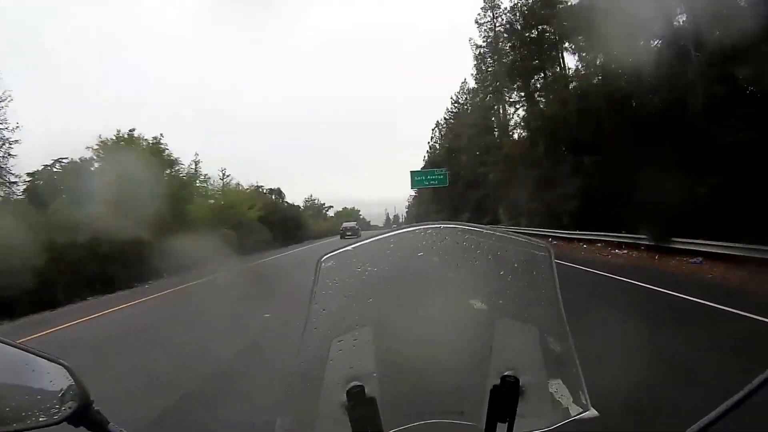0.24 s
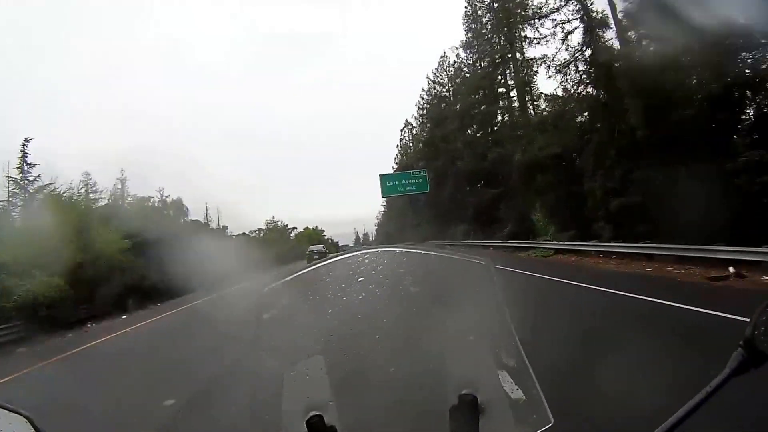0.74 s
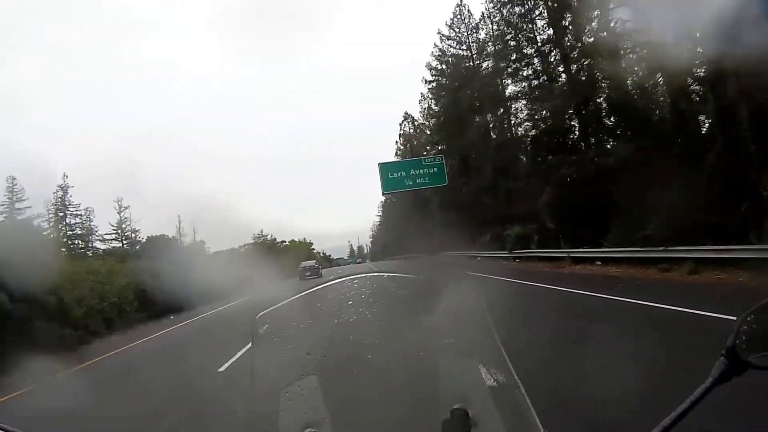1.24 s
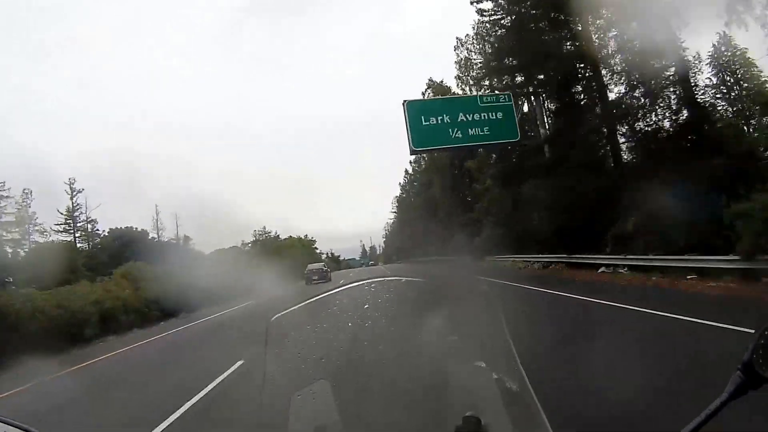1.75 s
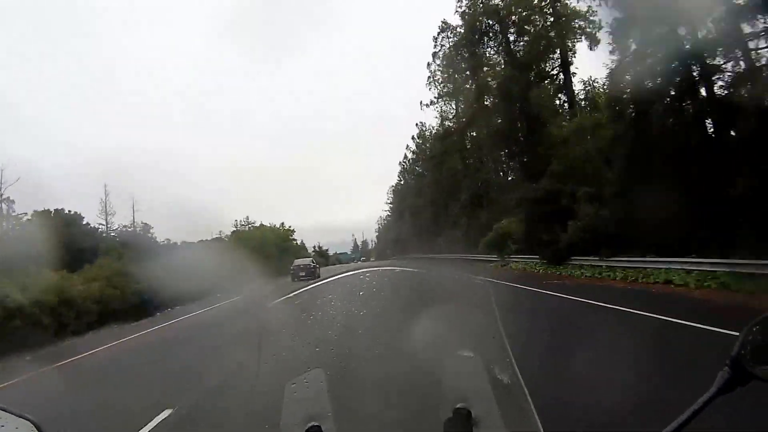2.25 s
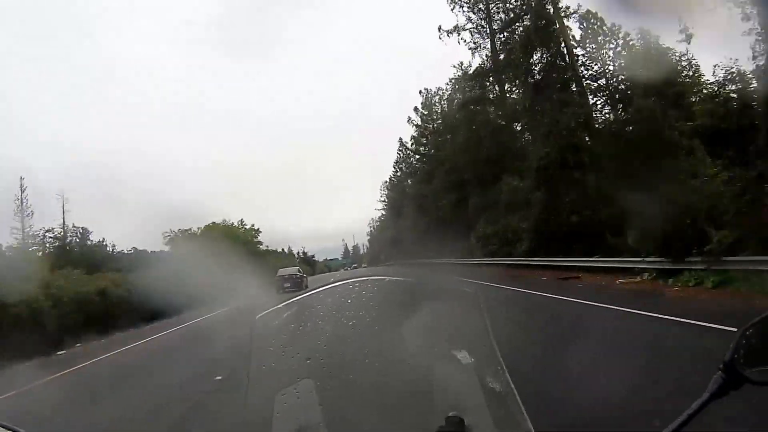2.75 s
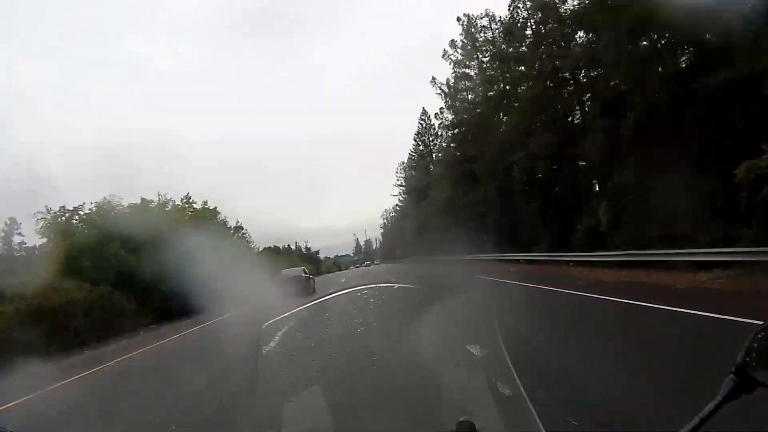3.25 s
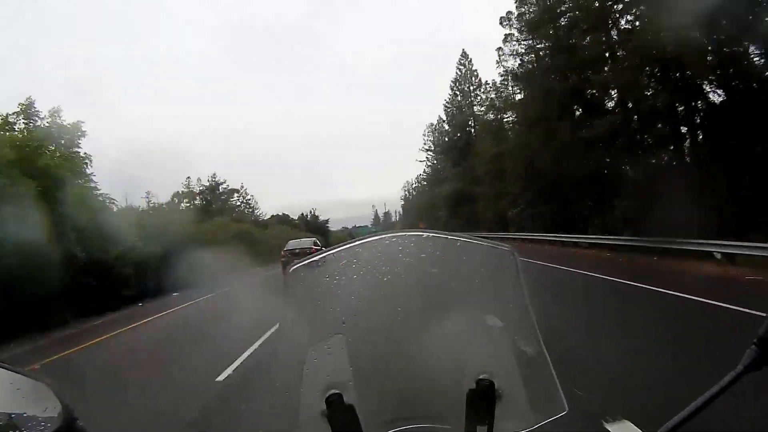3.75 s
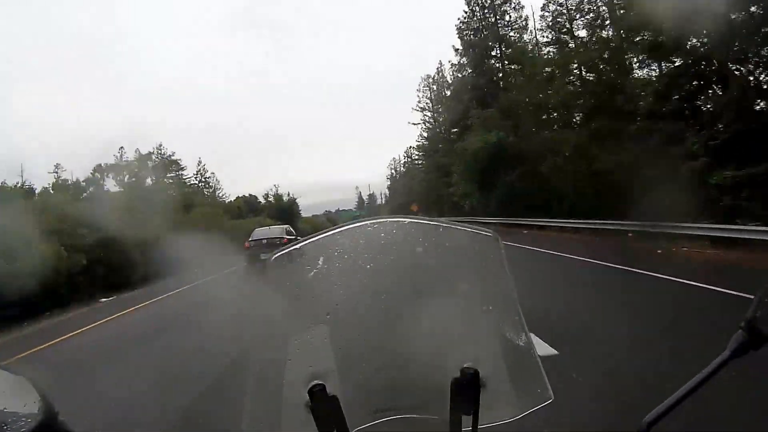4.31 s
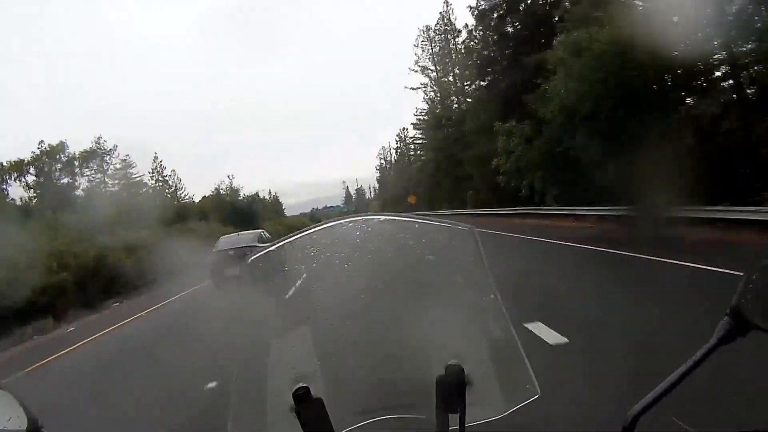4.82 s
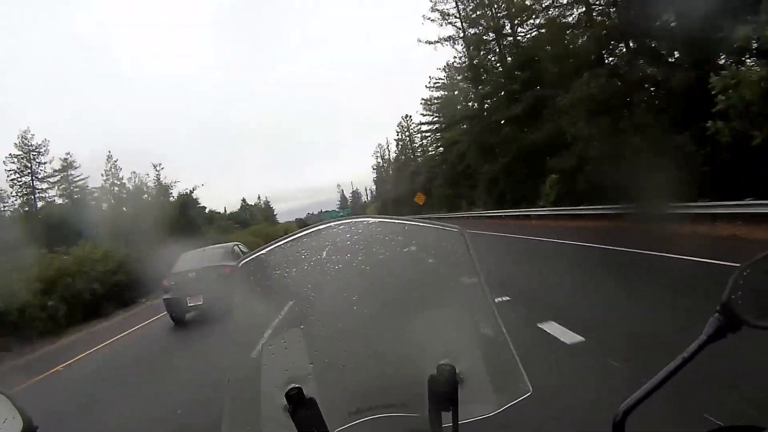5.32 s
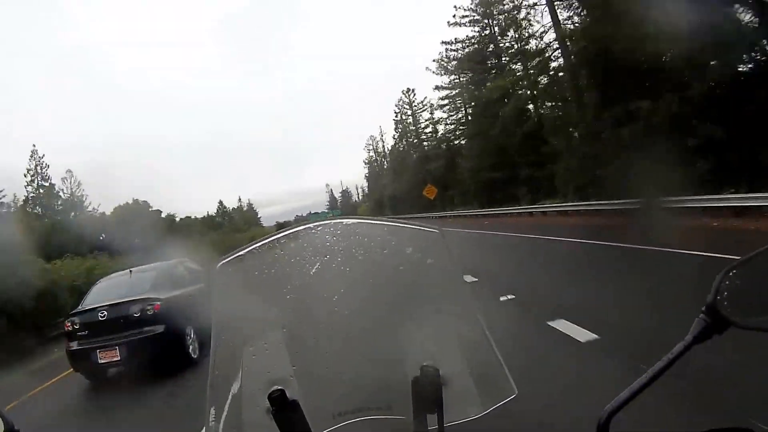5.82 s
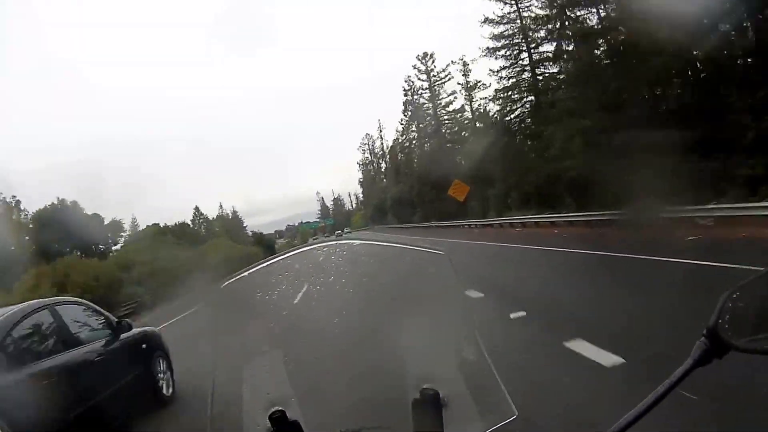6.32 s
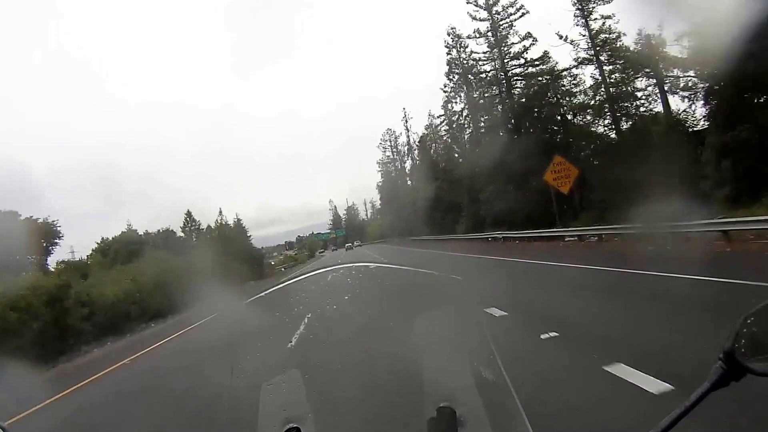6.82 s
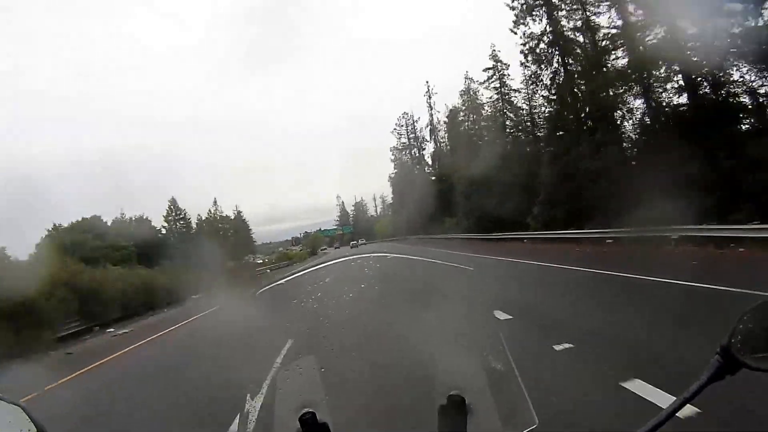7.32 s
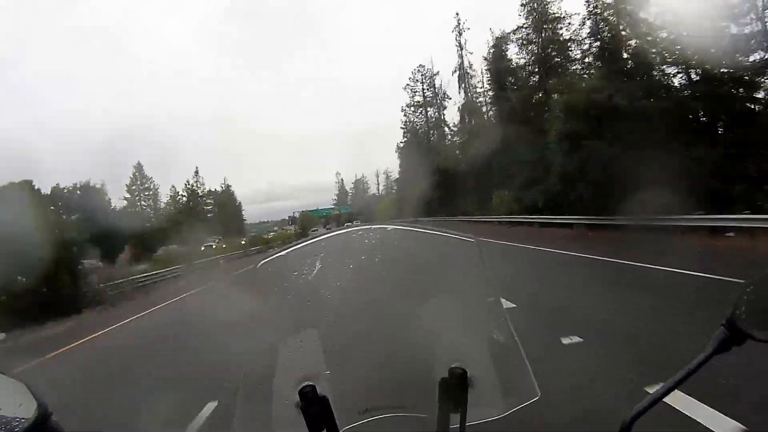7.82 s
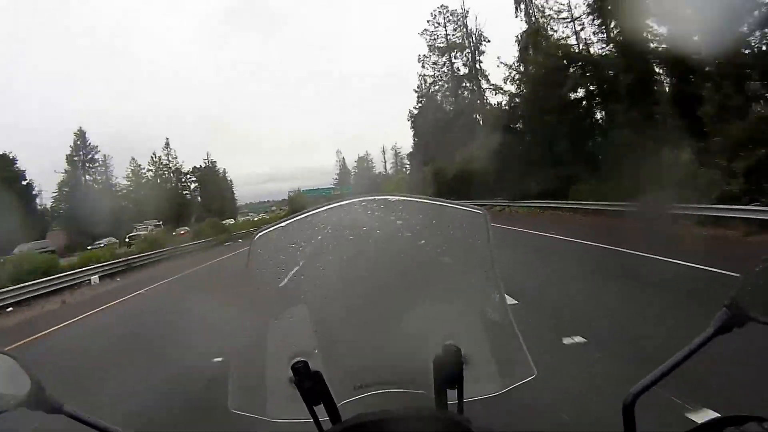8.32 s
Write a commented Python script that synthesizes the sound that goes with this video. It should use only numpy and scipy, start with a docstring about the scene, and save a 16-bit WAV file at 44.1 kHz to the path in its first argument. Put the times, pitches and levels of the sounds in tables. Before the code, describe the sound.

Deep, fluttering wind rumble buffets the microphone from start to finish, heard from inside a plastic camera housing on a motorcycle cruising a wet highway. The housing knocks on its mount in quick, irregular clusters of close, hollow clacks and thuds, busiest from about 2 to 3.3 seconds. Gusts land as low thumps; the hardest, near 3.2, 3.8, 4.8 and 8.3 seconds, can briefly overload the microphone and duck everything. The rumble tightens into short throbs between 4 and 5.3 seconds and again around 7. A continuous hiss of air and tyre spray sits behind it, with a few faint raindrop ticks. The engine drones quietly underneath at a steady, slightly wavering pitch. Around 5 seconds a faint tyre whine appears, then an overtaken car swishes softly by near 6 seconds. Wind and rattling carry on until the end, at about 8.5 seconds.

```python
"""Wind thuds and a plastic camera housing knocks on its mount as a motorcycle cruises a wet highway.
Eddies shed by the windscreen buffet the housing, and each impact rings the resonances of its shell.
Air and spray rush over it, raindrops tick, the engine drones underneath and an overtaken car swishes by.
The hardest gusts overload the microphone, and the gain control ducks everything for a moment."""
import sys
import numpy as np
from scipy import signal
from scipy.fft import rfft, irfft, next_fast_len
from scipy.io import wavfile
from scipy.ndimage import uniform_filter1d

SR = 44100
rng = np.random.default_rng(int(sys.argv[2]) if len(sys.argv) > 2 else 0)


def pcm_store(signal):
    """Save signal as 16-bit PCM."""
    levels = np.round(np.clip(np.atleast_2d(signal), -1, 1) * 32767)
    wavfile.write(sys.argv[1], SR, levels.astype(np.int16).T)


N = 377496
TIME = np.arange(N) / SR


# Strength of the airstream. Each row: time in seconds, relative rush in dB, relative buffeting in dB.
WIND_LEVELS = [(0, -35, -16), (0.45, -34, -17.5), (0.55, -33, -18), (0.72, -34.5, -19), (0.85, -32.5, -23),
               (1.1, -37, -11), (1.55, -34, -21), (1.7, -33, -29), (1.85, -36, -16), (1.97, -31.5, -19),
               (2.15, -36, -14), (2.36, -32, -19), (2.5, -37, -11.5), (2.9, -36, -10.5), (3.1, -38.5, -17),
               (3.25, -35, -9.5), (3.42, -35.5, -13.5), (3.75, -37, -12), (3.9, -36, -20.5),
               (4.0, -38, -12.5), (4.31, -33, -8), (4.46, -34.5, -11.5), (4.76, -37, -17),
               (4.85, -38.5, -16), (5.0, -35, -12), (5.08, -35.5, -22), (5.2, -36, -9), (5.5, -34.5, -17.5),
               (6.0, -33.8, -16.5), (6.41, -36.5, -13.5), (6.56, -35.5, -13), (6.9, -35.5, -16.5),
               (7.26, -34, -14), (7.5, -39.5, -7), (7.66, -32, -16.5), (7.88, -35, -20), (8.13, -34.5, -13),
               (8.28, -37, -14), (8.56, -35, -21)]

def wind_levels():
    """Unsteady flow modulates amplitude: the levels of rush and buffeting in dB at every sample."""
    times, rush_db, buffet_db = np.transpose(WIND_LEVELS)
    return np.interp(TIME, times, rush_db), np.interp(TIME, times, buffet_db)


# Pressure spectrum of the wake. Each row: frequency in Hz, relative spectral density in dB.
WAKE_SPECTRUM = [(8, -32), (22, -19), (32, -30), (42, -18), (54, 1), (66, -2.5), (90, -1.5), (130, -6.5),
                 (200, -14), (400, -28), (1500, -71)]

def eddies(evenness=0.55, clear_s=0.014):
    """Vortex shedding behind the windscreen gives fairly even swings; a hard gust sweeps them away."""
    wake = noise(lambda hz: spectrum_gain(WAKE_SPECTRUM, hz))
    envelope = uniform_filter1d(np.abs(signal.hilbert(wake)), SR // 100)
    gust_onsets = impulses([(start, 0) for start, _ in GUSTS])
    swept = swing(gust_onsets, hz=0, width_s=clear_s, lag_s=0)
    return unit_rms(wake / envelope ** evenness) * np.clip(1 - swept, 0, 1)


def buffeting(wake, level_db, trim_db=-9.5, gustiness_db=1.2, ceiling_db=-14):
    """The fluctuating pressure of the wake loads the housing, saturating softly at a ceiling."""
    pressure = from_db(level_db + trim_db + gustiness_db * drift(5.4)) * wake
    ceiling = from_db(ceiling_db)
    return ceiling * np.tanh(pressure / ceiling)


# Spells of periodic shedding. Each row: start in seconds, length in seconds, relative level in dB.
THROBS = [(0.95, 0.25, -17), (3.316, 0.11, -17), (3.94, 0.17, -9), (4.203, 0.13, -12), (4.458, 0.074, -10),
          (4.953, 0.069, -13), (5.127, 0.162, -9), (6.738, 0.13, -9.5), (7.412, 0.17, -9)]

def throb(buffet, throb_hz=55.93, wander=0.062, fade_s=0.036, takeover=0.63, trim_db=-10):
    """Lock-in: the eddies fall into step, and an even throb displaces much of the random buffeting."""
    tone = np.sin(wandering_phase(throb_hz, wander, drift_hz=8.1))
    for start, length, db in THROBS:
        locked = np.clip(np.minimum(TIME - start, start + length - TIME) / fade_s, 0, 1)
        buffet = buffet * (1 - takeover * locked) + from_db(db + trim_db) * locked * tone
    return buffet


# Gusts that slam into the housing. Each row: time in seconds, relative peak pressure in dB.
GUSTS = [(0.1425, 0.5), (0.205, -7), (0.248, -2.5), (0.486, 0.5), (0.736, -0.5), (1.54, -1.5), (1.885, 0.6),
         (2.048, -2.5), (2.282, -1), (2.426, -0.5), (2.632, 0), (2.705, -0.5), (2.751, -1.5), (2.864, -2.5),
         (3.161, 3), (3.228, 0.5), (3.49, -1.9), (3.759, 3), (4.1075, 2), (4.322, 0.5), (4.435, -2.5),
         (4.589, 1.5), (4.784, 3), (5.376, -0.5), (6.175, -2), (6.504, 1), (6.584, -0.5), (6.956, -1.3),
         (7.045, -0.5), (7.189, 2), (7.748, -1), (7.955, -0.5), (8.252, 4)]

def gusts(suction_db=-12, crest_db=-24, swing_hz=70, width_s=0.0082, lead_s=0.0077):
    """Each hard gust is a pressure transient: a small crest, then one deep suction."""
    slams = impulses(GUSTS)
    crest = from_db(crest_db) * swing(slams, swing_hz, width_s, -lead_s)
    suction = from_db(suction_db) * swing(slams, swing_hz, width_s, 0)
    return crest - suction


# Impacts of the housing on its stop. Each row: time in seconds, relative peak level in dB.
KNOCKS = [(0.0179, -9.5), (0.0315, -6), (0.1257, -6.5), (0.144, -1), (0.1901, -0.5), (0.208, -3),
          (0.2509, 0), (0.2983, 2.5), (0.3139, -0.5), (0.3319, -10), (0.3475, -13.0), (0.45, -9),
          (0.4889, -3), (0.549, -1.5), (0.563, 0.5), (0.6134, -7.5), (0.6615, -11), (0.7044, -17),
          (0.724, -7.5), (0.742, 5), (0.8897, -11), (0.908, -15), (0.955, -13), (1.07, -2), (1.1345, -7.5),
          (1.154, -8.5), (1.2283, -6.5), (1.3161, -4.5), (1.3305, -14), (1.4088, -10), (1.4227, -2),
          (1.437, -7), (1.5106, -10), (1.5271, -4.5), (1.5428, -3), (1.5575, -1), (1.5683, -3),
          (1.586, 2.5), (1.6041, -3.5), (1.63, -10), (1.7448, -3.5), (1.7574, -7), (1.7733, -8),
          (1.847, -6.5), (1.8869, -2.5), (1.927, -6), (1.9774, -13), (2.0163, -6.5), (2.037, -2.5),
          (2.0515, -4), (2.0668, -4), (2.1316, 1.5), (2.1479, 1.5), (2.165, -2.5), (2.18, -10),
          (2.221, -12), (2.2441, -3.5), (2.264, -7), (2.2849, 1.5), (2.307, 4.5), (2.325, 2.5),
          (2.3941, -4.5), (2.4102, -12), (2.4282, -10), (2.471, 2), (2.4898, 0.5), (2.5306, -5),
          (2.5493, -6.5), (2.6155, -2.5), (2.6334, 0.5), (2.651, 5.5), (2.7109, -3.5), (2.7547, 2.5),
          (2.7736, -1.5), (2.831, -9), (2.8507, -6.5), (2.866, -2.5), (3.0454, -4), (3.1527, -6),
          (3.1709, 6.5), (3.2332, 7.5), (3.25, 8.5), (3.2698, 1), (3.292, 2.5), (3.3107, -0.5),
          (3.4537, -9.5), (3.4986, 0), (3.5216, -8.5), (3.5614, -9.5), (3.584, -12), (3.6525, -9.5),
          (3.675, -7.5), (3.804, 4), (3.8215, 3.5), (3.962, -6), (3.98, -6), (4.055, -8.5), (4.107, -3.5),
          (4.131, -1), (4.1816, -2.5), (4.309, -7.5), (4.328, 4.5), (4.3465, 2.5), (4.368, -2),
          (4.421, -3.5), (4.442, -3), (4.579, -8), (4.6673, -4), (4.6875, -7.5), (4.702, -12),
          (4.756, -7.5), (4.998, -9.5), (5.045, -4.5), (5.1093, -8.5), (5.1659, -7.5), (5.2558, -5.5),
          (5.3326, -6.5), (5.3605, -3.5), (5.378, -0.5), (5.4002, 1.5), (5.4204, 0.5), (5.4953, -8),
          (5.6133, -5.5), (5.6275, -6), (5.6467, -4), (5.667, -24), (5.692, -16), (5.7487, -11.5),
          (5.7815, -18), (5.8637, -8), (5.935, -10), (5.97, -10.5), (5.9966, -12), (6.019, -7),
          (6.0405, -4.5), (6.1651, -6), (6.1839, 0.5), (6.2124, -8.5), (6.296, -8.5), (6.393, -6.5),
          (6.413, -13.5), (6.508, -5.5), (6.5719, 0), (6.5901, 6), (6.6643, -2.5), (6.7813, -7.5),
          (6.796, -3.5), (6.8104, -4.0), (6.828, -5), (6.8736, -3.5), (6.8915, -8.5), (6.9616, -8.5),
          (6.9822, -7), (7.055, -5.5), (7.0776, -7), (7.1017, -9), (7.1246, -2), (7.1436, -11), (7.2998, 1),
          (7.32, -17), (7.349, -5), (7.3716, -0.5), (7.3978, -1.5), (7.4205, -7.5), (7.622, -6),
          (7.6735, -10.5), (7.737, -9.5), (7.802, -3.5), (7.8204, -6), (7.893, -8), (7.952, -12.5),
          (8.2172, -10), (8.2404, -9), (8.26, 1.5), (8.3527, -9), (8.3698, -8), (8.443, -11),
          (8.5262, -9.5)]

def rattle(wake, touch_db=-26, spread_db=6, rebound_db=-7.5, thump_hz=250, thump_s=0.0025, shove_s=0.0023):
    """Impact excitation: the housing rocks and hits its stop with a tick, a thump and a shove of air."""
    knocks = impulses(KNOCKS)
    delays_s = rng.uniform(0.0004, 0.0014, len(KNOCKS))
    rebounds = impulses([(start + delay, db + rebound_db) for (start, db), delay in zip(KNOCKS, delays_s)])
    # Every crest of the wake adds a light touch.
    wake_phase = np.unwrap(np.angle(signal.hilbert(wake)))
    crests = np.flatnonzero(np.diff(wake_phase // (2 * np.pi)) > 0)
    touches = np.zeros(N)
    touches[crests] = from_db(touch_db + spread_db * np.minimum(rng.standard_normal(N)[crests], 2))
    blows = knocks + touches
    push = np.tanh(blows)   # the mount gives way under the hardest blows
    t = np.arange(SR // 20) / SR
    thump = from_db(-7) * np.exp(-t / thump_s) * np.sin(2 * np.pi * thump_hz * t)
    shove = from_db(-12) * np.sin(np.pi * np.minimum(t / shove_s, 1)) ** 2
    thuds = low_cut(signal.fftconvolve(push, thump + shove)[:N], hz=70)
    rocking = from_db(-25) * swing(push, hz=56.8, width_s=0.019, lag_s=0.0042)
    ticks = from_db(-1.5) * signal.fftconvolve(blows + rebounds, housing_ring())[:N]
    return ticks + crack(blows) + thuds + rocking


def crack(blows, level_db=-21, decay_s=0.0021, dull_hz=3500):
    """Friction: the faces grate as they meet, a broadband snap that is different on every blow."""
    grit = noise(lambda hz: housing_gain(hz) ** 0.48 * hz / np.hypot(hz, 700) / np.hypot(1, hz / dull_hz))
    return from_db(level_db) * decays(blows, decay_s) * grit


# Resonances of the shell. Each row: frequency in Hz, nominal width in Hz, relative level in dB.
SHELL_MODES = [(286, 158, 35.5), (673, 116, 23), (934, 102, 17.5), (1403, 170, 12), (1750, 56, 7.5),
               (1985, 113, 11), (2290, 92, 10), (2500, 176, 14), (2773, 200, 13), (3370, 320, 11.5),
               (4480, 360, -1), (5030, 540, -8), (7820, 1040, -6), (8630, 160, 4.5), (9380, 400, 2.5),
               (10840, 1500, -6.5), (11960, 410, -2), (13100, 890, -4), (14600, 1230, -3)]

def housing_gain(hz):
    """Modal summation: the resonances of the shell add in power to give its magnitude response."""
    powers = [from_db(db) ** 2 / (1 + ((hz - centre) / (0.62 * width)) ** 2) ** 1.6
              for centre, width, db in SHELL_MODES]
    return np.sqrt(sum(powers))


# Bands in which bending waves linger in the shell. Each row: centre in Hz, half-width in Hz.
DISPERSION_BANDS = [(1900, 500), (3100, 95), (4500, 200), (6500, 3900), (9000, 140), (12000, 310),
                    (14500, 210)]

def housing_ring(size=2048):
    """The impulse response of the shell: a minimum-phase ring, spread in time by dispersion."""
    hz = np.fft.rfftfreq(size, 1 / SR)
    magnitude = housing_gain(hz) * (hz + 1) / np.hypot(hz, 700)
    cepstrum = irfft(np.log(magnitude))
    minimum_phase = np.exp(rfft(2 * cepstrum[:size // 2], size))
    phase_lag = 2 * sum(np.arctan((hz - centre) / width) + np.arctan((hz + centre) / width)
                        for centre, width in DISPERSION_BANDS)
    return irfft(minimum_phase * np.exp(-1j * phase_lag)) / np.abs(irfft(minimum_phase)).max()


# Spectrum of the airstream's push on the shell. Each row: frequency in Hz, relative level in dB.
RUSH_SPECTRUM = [(30, 12.5), (120, 6), (270, 0), (450, -3.5), (700, 1), (1400, 1.5), (2700, -1),
                 (4500, -36), (9000, -0.5), (15000, 2)]

def rush(wake, gain_db=9, pulsing_db=2.5, flutter_db=3):
    """Forced vibration: turbulence scours the shell in puffs that follow the pressure of the wake."""
    air = noise(lambda hz: housing_gain(hz) * spectrum_gain(RUSH_SPECTRUM, hz))
    return from_db(gain_db + pulsing_db * wake + flutter_db * drift(49)) * air


# Spectrum of tyre spray on the wet road. Each row: frequency in Hz, relative spectral density in dB.
SPRAY_SPECTRUM = [(100, 5.5), (400, 1), (1100, 10), (2000, -0.5), (4000, -1), (4400, -2.5), (4800, -5),
                  (5500, -4.5), (6000, -14.5), (6500, -6.5), (7600, -6.5), (10400, -12.5), (11200, -8),
                  (13000, -21), (13800, -29), (15000, -31)]

def spray(gain_db=-1):
    """Countless droplets thrown up by the tyres add incoherently into broadband noise."""
    return from_db(gain_db) * noise(lambda hz: spectrum_gain(SPRAY_SPECTRUM, hz))


# Big raindrops on the housing. Each row: time in seconds, relative peak level in dB.
RAINDROPS = [(0.2018, -22), (0.4032, -24), (1.05, -24), (1.5319, -31), (3.028, -30), (3.638, -28),
             (5.0938, -30), (5.1143, -27), (7.7897, -23)]

def rain(tick_hz=6100, width_hz=2200, decay_s=0.002, fine_per_s=25, fine_db=-37, gain_db=-0.5):
    """Each drop's impact is a decaying burst of bright splash; fine drops fall at random among the big."""
    fine_arrivals = rng.random(N) < fine_per_s / SR
    fine_drops = fine_arrivals * from_db(fine_db - 0.5 * rng.standard_normal(N))
    bursts = decays(impulses(RAINDROPS) + fine_drops, decay_s)
    return from_db(gain_db) * bursts * noise_band(tick_hz, width_hz, slope=4)


# Partials of the engine's drone. Each row: multiple of the crank rate, mean level in dB.
ENGINE_ORDERS = [(1, -35.5), (2, -31.5), (4, -42.5), (5, -39)]

def engine(crank_hz=66.55, wander=0.02003, waver_db=5):
    """Periodic rotation gives harmonics of the crank rate, wavering under a steady throttle."""
    crank_angle = wandering_phase(crank_hz, wander, drift_hz=1.379)
    return sum(from_db(db + waver_db * drift(7.7)) * np.sin(order * crank_angle)
               for order, db in ENGINE_ORDERS)


def overtaken_car(roar_db=-38.5, nearest_s=5.9, swell_s=0.36, whine_db=-46, whine_s=5.2):
    """Wet tyres grow louder as distance shrinks: a faint tread whine ahead, then a roar alongside."""
    roar = noise_band(1000, 450, slope=4) / (1 + ((TIME - nearest_s) / swell_s) ** 2)
    whine = noise_band(1244, 8) * np.exp(-((TIME - whine_s) / 0.32) ** 2)
    return from_db(roar_db) * roar + from_db(whine_db) * whine


def port_eddies(level_db=-38, corner_hz=130):
    """Local turbulence: small eddies rumble at each microphone port, uncorrelated between the two."""
    return from_db(level_db) * np.array([noise_band(0, corner_hz) for _ in range(2)])


def port_hiss(gain_db=-13, corner_hz=1500):
    """Grazing flow gives each port a hiss of its own, coloured by the resonances of the shell."""
    sides = [noise(lambda hz: housing_gain(hz) * hz / np.hypot(hz, corner_hz)) for _ in range(2)]
    return from_db(gain_db) * np.array(sides)


def whistle(gain_db=-20, centre_hz=4390, width_hz=110, waver_db=4):
    """An edge tone: air sings faintly and fitfully past an edge."""
    return from_db(gain_db + waver_db * drift(6.5)) * noise_band(centre_hz, width_hz)


def thin_hiss(level_db=-54, centre_hz=12000, width_hz=190, pan_db=5.5):
    """Narrow-band noise: a high hiss, uncorrelated between the ears and stronger on the left."""
    sides = np.array([noise_band(centre_hz, width_hz) for _ in range(2)])
    return from_db(level_db + pan_db * np.array([[1], [-1]])) * sides


def ports(pressure, bass_gain=50, corner_hz=6, mismatch=0.013, treble_hz=8000, delay_samples=4):
    """The left port feels far more bass; interference with a reflection sets the two apart in the treble."""
    bass = signal.sosfilt(signal.butter(1, corner_hz, fs=SR, output="sos"), pressure)
    reflection = mismatch * np.roll(low_cut(pressure, treble_hz), delay_samples)
    return np.array([pressure + bass_gain * bass + reflection, pressure - reflection])


def gain_control(x, threshold_db=-1, overreaction=3.99, deepest_db=11, release_db_per_s=80):
    """Compression: suction near overload pulls the gain down hard; it climbs back at a steady rate."""
    attack_s, late_s = 0.00091, 0.00575
    smoothed = uniform_filter1d(x, 150, axis=1)
    suction = np.maximum(-smoothed.min(axis=0), 1e-9)
    demand_db = np.clip(overreaction * (20 * np.log10(suction) - threshold_db), 0, deepest_db)
    release_db = release_db_per_s * TIME
    held_db = np.maximum.accumulate(demand_db + release_db) - release_db
    late_db = np.interp(TIME - late_s, TIME, held_db)
    pole = np.exp(-1 / (attack_s * SR))
    return x * from_db(-signal.lfilter([1 - pole], [1, -pole], late_db))


def from_db(db):
    """The amplitude ratio of a level in decibels."""
    return 10 ** (np.asarray(db) / 20)


def unit_rms(x):
    """Normalisation to an rms of 1."""
    return x / np.sqrt(np.mean(x ** 2) + 1e-20)


def spectrum_gain(points, hz):
    """The gain of a spectrum table, interpolated over logarithmic frequency."""
    table_hz, db = np.transpose(points)
    return from_db(np.interp(np.log(hz + 1), np.log(table_hz), db))


def noise(gain_at):
    """Spectral shaping: white noise weighted by a function of frequency, with an rms of 1."""
    size = next_fast_len(N)
    spectrum = rfft(rng.standard_normal(size)) * gain_at(np.fft.rfftfreq(size, 1 / SR))
    return unit_rms(irfft(spectrum, size)[:N])


def noise_band(centre_hz, width_hz, slope=2):
    """Band-limited noise whose spectrum falls to half amplitude width_hz from its centre."""
    return noise(lambda hz: 1 / (1 + ((hz - centre_hz) / width_hz) ** slope))


def drift(rate_hz):
    """Low-pass noise: a slow random fluctuation with an rms of 1."""
    return noise_band(0, rate_hz)


def wandering_phase(hz, wander, drift_hz):
    """Phase in radians is the integral of frequency, which here drifts by the rms fraction wander."""
    return 2 * np.pi * np.cumsum(hz * (1 + wander * drift(drift_hz))) / SR


def impulses(rows):
    """An impulse train from rows of time in seconds and level in dB."""
    times, db = np.transpose(rows)
    samples = np.clip(np.round(times * SR).astype(int), 0, N - 1)
    return np.bincount(samples, from_db(db), N)


def decays(hits, decay_s):
    """Damping: each impulse starts an exponentially falling envelope."""
    return signal.lfilter([1], [1, -np.exp(-1 / (decay_s * SR))], hits + 1e-18)


def swing(pushes, hz, width_s, lag_s):
    """Each push becomes a Gaussian wave packet of pressure that crests lag_s after it."""
    t = np.arange(-SR // 20, SR // 20 + 1) / SR - lag_s
    packet = np.exp(-(t / width_s) ** 2) * np.cos(2 * np.pi * hz * t)
    return signal.fftconvolve(pushes, packet, "same")


def low_cut(x, hz):
    """A second-order high-pass filter."""
    return signal.sosfilt(signal.butter(2, hz, "high", fs=SR, output="sos"), x)


def scene():
    """Superposition: wind, knocks, spray, rain, engine and a car reach both ports through the housing."""
    rush_db, buffet_db = wind_levels()
    wake = eddies()
    buffet = throb(buffeting(wake, buffet_db))
    airstream = from_db(rush_db - 0.44) * (spray() + rush(wake) + whistle())
    shell = buffet + gusts() + airstream + rattle(wake) + rain() + engine() + overtaken_car()
    return ports(low_cut(shell, hz=33.3)) + port_eddies() + from_db(rush_db) * port_hiss() + thin_hiss()


def record(dry, top_cut_hz=15400):
    """Overload: peaks that slip past the gain control and low cut are flattened, then low-pass filtered."""
    ducked = low_cut(gain_control(dry), hz=7.2)
    overloaded = np.clip(ducked, -1, 1)
    return signal.sosfilt(signal.ellip(10, 0.1, 80, top_cut_hz, fs=SR, output="sos"), overloaded)


dry = scene()
out = record(dry)
pcm_store(out)
```